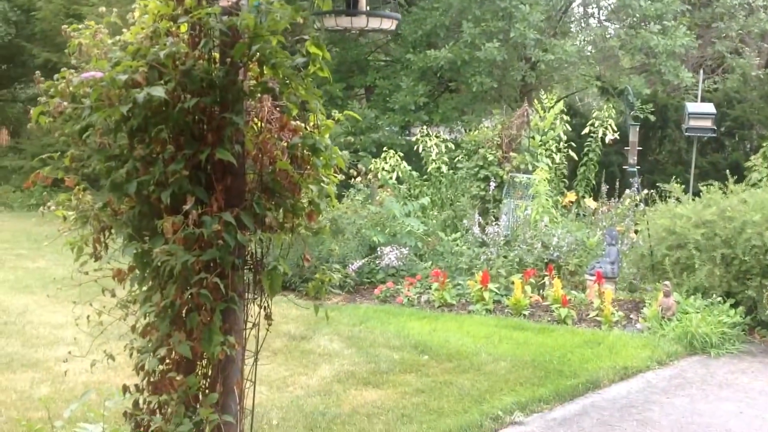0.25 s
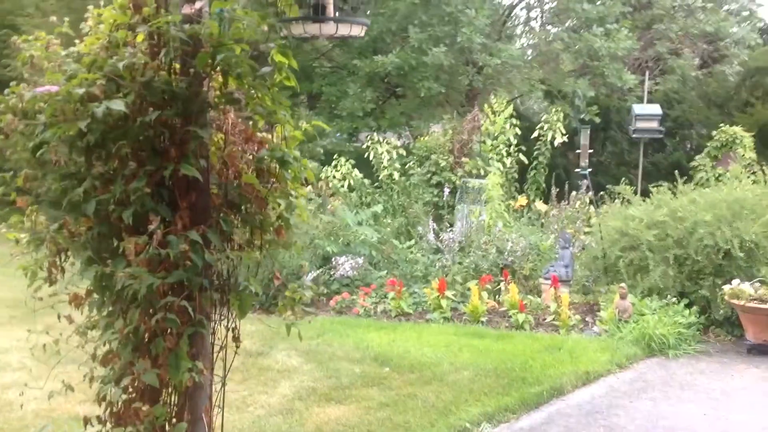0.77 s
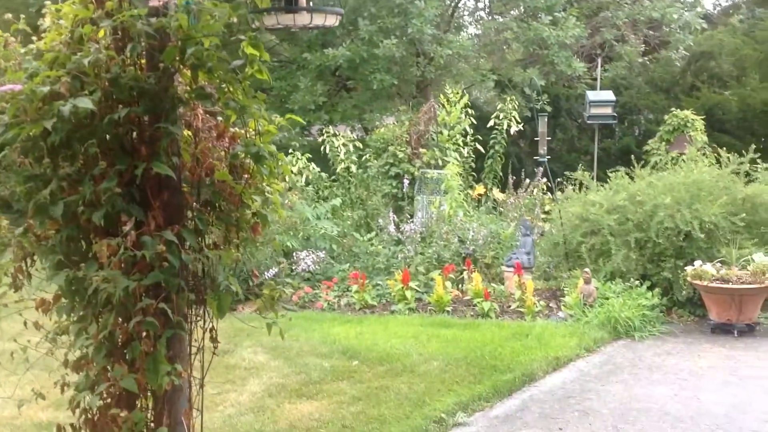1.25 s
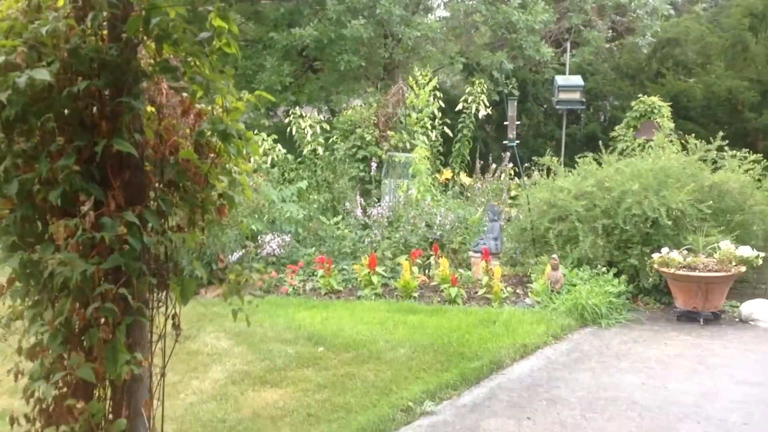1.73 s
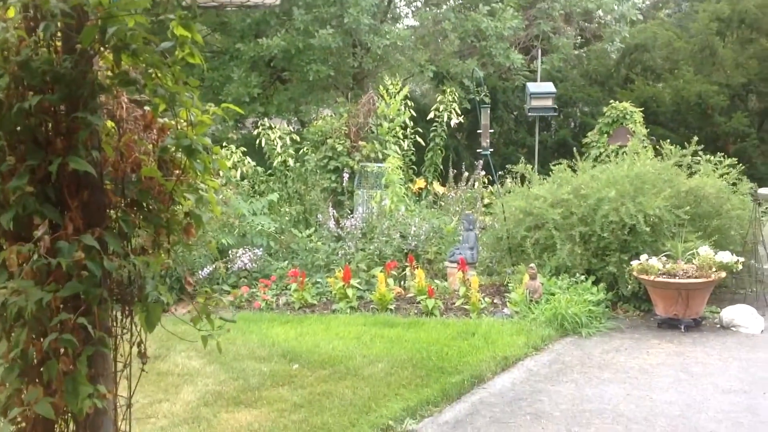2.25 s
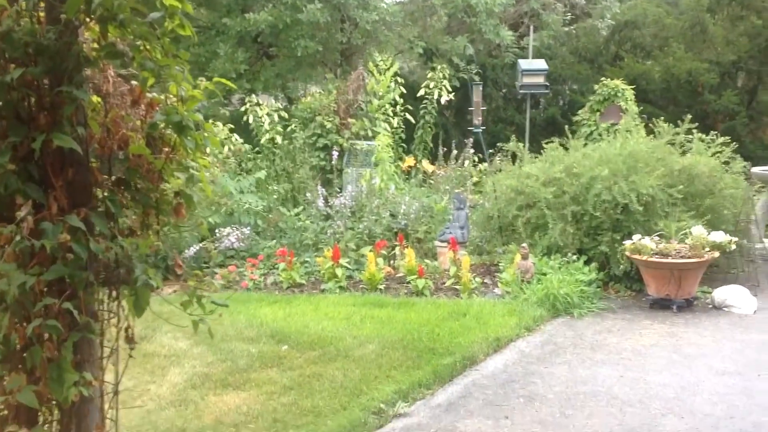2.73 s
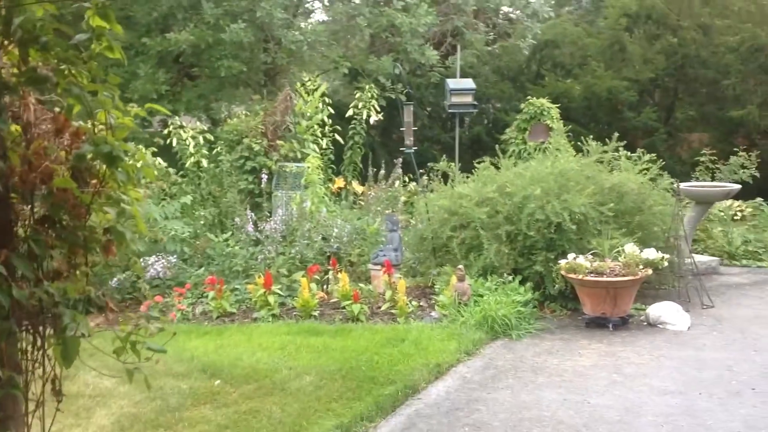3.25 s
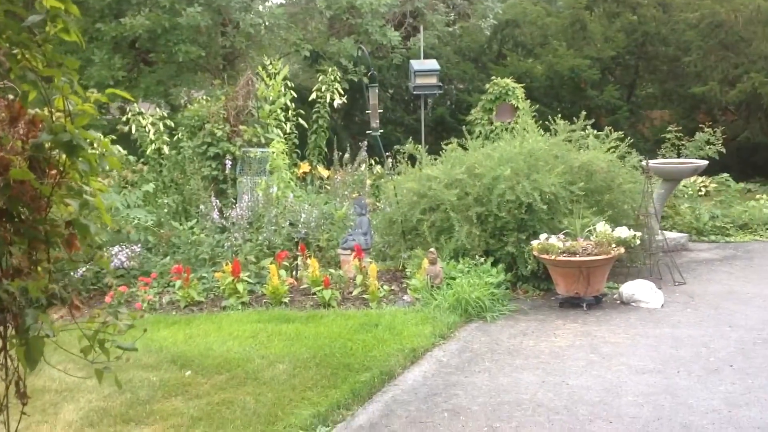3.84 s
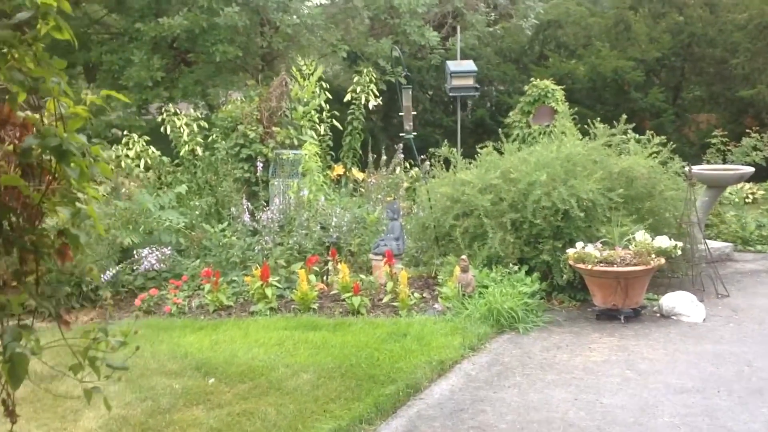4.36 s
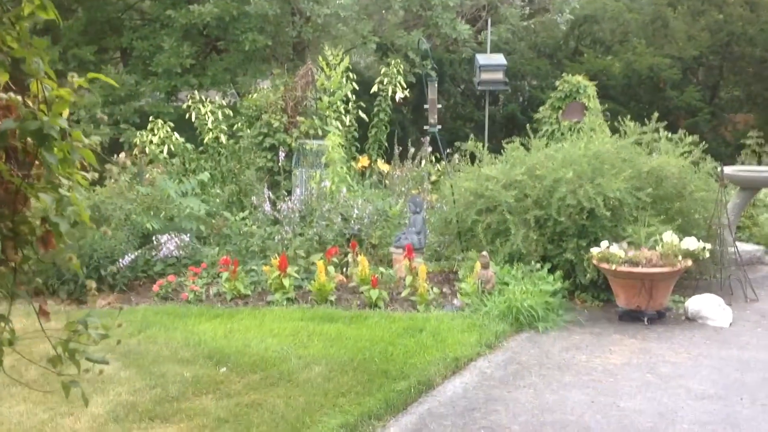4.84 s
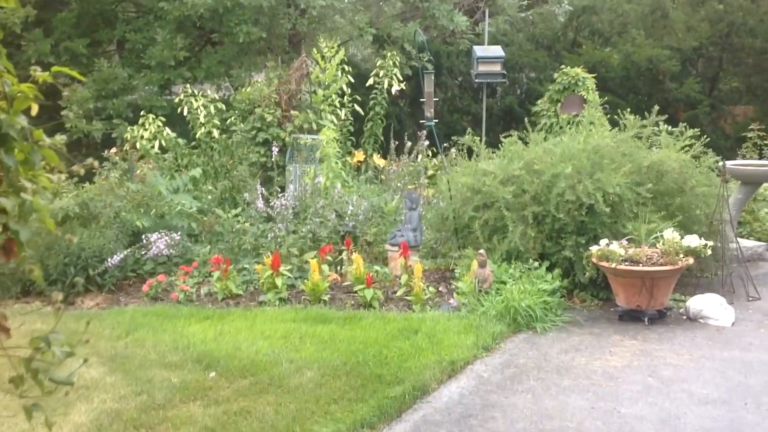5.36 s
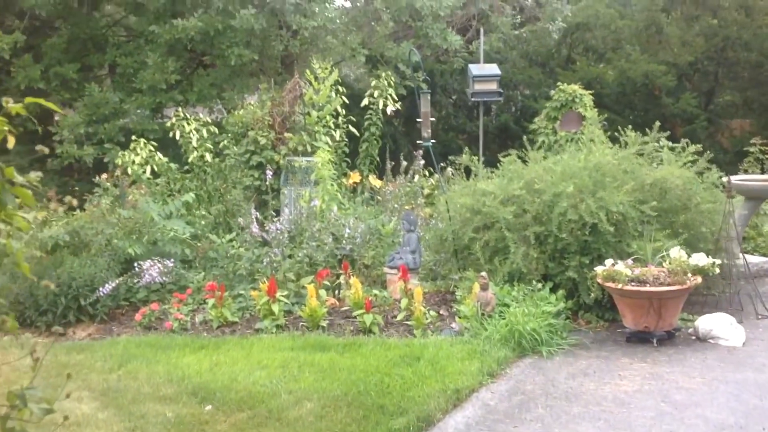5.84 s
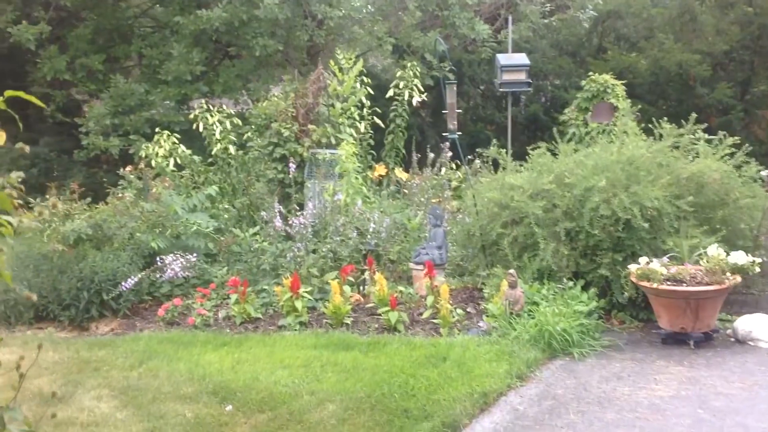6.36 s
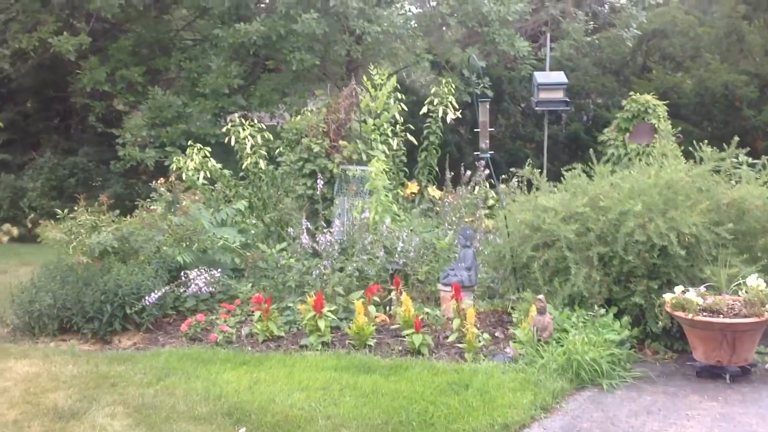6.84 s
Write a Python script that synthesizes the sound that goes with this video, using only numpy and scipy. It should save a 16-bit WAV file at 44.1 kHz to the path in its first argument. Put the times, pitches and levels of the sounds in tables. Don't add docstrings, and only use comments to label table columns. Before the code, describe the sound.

Five sharp firecracker bangs burst some way off in a garden neighbourhood, each slapping back off house walls and rolling away through trees.

```python
import sys
import numpy as np
from scipy import signal
from scipy.fft import rfft, irfft, next_fast_len
from scipy.io import wavfile
from scipy.ndimage import uniform_filter1d

SR = 44100
rng = np.random.default_rng(int(sys.argv[2]) if len(sys.argv) > 2 else 0)


def output_pcm(signal):
    pcm = np.clip(np.atleast_2d(signal).T, -1, 1) * 32767
    wavfile.write(sys.argv[1], SR, np.round(pcm).astype(np.int16))


def voltage_ratio(decibels):
    exponent = np.asarray(decibels, float) / 20
    return 10 ** exponent


N = 313110

# start in seconds, peak level in dB, blast length in ms, ground bounce in dB.
BURSTS = [
    (1.02466, 7.5, .32, -1),
    (2.33497, 7.5, .31, -2),
    (3.79624, 5.8, .39, 0),
    (5.9377, 7.5, .355, -.5),
    (6.79039, 8.7, .356, 2.3),
]
# sharp front in dB, roll in dB, roll brightness in dB per octave,
# near walls in dB, far walls in dB.
AFTER = [
    (-8, -19.5, 1.5, -7, 1),
    (-2, -19.5, 1.5, -4, 3),
    (-24, -20, 0.8, -1, -2),
    (-27, -19.5, 1, 3, -2),
    (-37, -20.5, 2, 5, 1.5),
]
# frequency in Hz, level in dB per Hz.
ROLL = [(24, -59), (40, -50), (97, -19.5), (149, -1), (264, 2), (327, 2), (566, -7), (735, -5), (1500, -14),
        (1740, -15.5), (2610, -19.5), (3820, -36), (7810, -50.5), (12000, -66), (15600, -88), (22000, -120)]


def unit(x):
    return x / np.sqrt(np.mean(x ** 2) + 1e-20)


def along(points, hz):
    f, v = np.transpose(points)
    return np.interp(np.log(hz + 1), np.log(f + 1), v)


def filtered(x, response):
    m = next_fast_len(len(x) + 8192)
    return irfft(rfft(x, m) * response(np.fft.rfftfreq(m, 1 / SR)), m)[:len(x)]


def band(centre_hz, q):
    return lambda f: 1j * f * centre_hz / q / (centre_hz ** 2 - f * f + 1j * f * centre_hz / q)


def add(track, s, sound):
    part = track[max(round(s * SR), 0):][:len(sound)]
    part += sound[:len(part)]


def patches(shape, patchy_db):
    field = rng.standard_normal(shape)
    field = uniform_filter1d(field, size=4, axis=0)
    field = uniform_filter1d(field, size=8, axis=1)
    return voltage_ratio(patchy_db * unit(field))


def rush(spectrum, patchy_db):
    z = signal.stft(rng.standard_normal(N + 512), nperseg=512)[2]
    patchy = signal.istft(z * patches(z.shape, patchy_db), nperseg=512)[1][:N]
    return unit(filtered(patchy, lambda hz: voltage_ratio(along(spectrum, hz))))


def traffic():
    # time in seconds, level in dB.
    swells = [(0, -42.5), (.5, -43.5), (0.949, -46), (2, -43.5), (3.5, -44), (4.7, -44), (5.2, -44.5),
              (5.898, -45.5), (7.1, -43.5)]
    # frequency in Hz, level in dB per Hz.
    hum = [(15, -72), (40, -44), (90, -16), (146, -5), (216, 0.5), (366, -1.5), (565, -5.5), (1000, -6.5),
           (1520, -6.5), (1750, -13), (2700, -17.5), (3700, -32), (6000, -83), (13200, -120)]
    s, db = np.transpose(swells)
    return voltage_ratio(np.interp(np.arange(N) / SR, s, db)) * rush(hum, patchy_db=.8)


def far_pops():
    # middle in seconds, level in dB, length in seconds.
    pops = [(0.228, -48, 0.038), (0.968, -42, 0.014), (4.457, -45, 0.069), (4.99, -41, 0.067),
            (5.34, -43, 0.02), (5.534, -44.5, 0.025), (5.626, -45, 0.035)]
    t = np.arange(N) / SR
    swell = sum(voltage_ratio(db) * np.exp(-.5 * ((t - s) / length) ** 2) for s, db, length in pops)
    return swell * unit(filtered(rng.standard_normal(N), lambda f: band(300, 1.2)(f) ** 2))


def bird():
    # seconds after the start, length in seconds, from Hz, to Hz, level in dB.
    long_call = [
        (0, .028, 5950, 6800, -17),
        (.034, .024, 4800, 4750, -6),
        (.058, .009, 4600, 3350, -5),
        (.067, .014, 3350, 3150, -9),
        (.084, .016, 3250, 4100, 0),
        (.1, .011, 4150, 3850, 0),
        (.111, .017, 3800, 3050, -1),
    ]
    short_call = [
        (.004, .034, 6280, 6230, -1),
        (.044, 0.029, 4350, 4850, 2.5),
        (.07, .02, 3950, 3800, 4),
    ]
    # start in seconds, rms level in dB, pitch factor, echo in dB.
    long_at = [
        (.172, -48, 1.005, 0),
        (2.515, -52, 1.01, 3),
        (4.051, -51, 1.01, 2),
        (5.734, -51, 1.005, -2),
    ]
    # start in seconds, rms level in dB, pitch factor, echo in dB.
    short_at = (6.674, -62, 1, 1)
    note_edge_s, glide_ease, husk_db = .003, 1.1, -24
    air = np.zeros(N)
    t, fade = np.arange(SR // 7) / SR, np.arange(SR // 2) / SR
    calls = [(long_call, c) for c in long_at] + [(short_call, short_at)]
    for notes, (start, level_db, factor, echo_db) in calls:
        s, length, from_hz, to_hz, db = np.transpose(notes)[..., None]
        gate = np.clip(np.minimum(t - s, s + length - t) / note_edge_s + .5, 0, 1)
        glide = to_hz + (from_hz - to_hz) * np.clip(1 - (t - s) / length, 0, 1) ** glide_ease
        flutter = unit(uniform_filter1d(rng.standard_normal((2, len(t))), size=90))
        pitch = factor * (gate * glide).sum(0) / (gate.sum(0) + 1e-9) * (1 + .012 * flutter[0])
        phase = 2 * np.pi * np.cumsum(pitch) / SR
        low_note = pitch < 5000
        edge = voltage_ratio(-14) * np.sin(2 * phase) + voltage_ratio(-21) * np.sin(2.5 * phase) * low_note
        shrill = np.clip((pitch - 3900) / 800, .15, 1)
        tone = np.sin(phase) + voltage_ratio(-26) * np.sin(3 * phase) * low_note + edge * shrill
        tone = tone + voltage_ratio(husk_db) * unit(np.diff(rng.standard_normal(len(t) + 2), 2))
        call = voltage_ratio(level_db + 3 + 4 * flutter[1]) * (gate * voltage_ratio(db)).sum(0) * tone
        leaves = rng.standard_normal(len(fade)) * voltage_ratio(-60 * fade / .55)
        leaves = leaves / np.linalg.norm(leaves)
        blur = filtered(leaves, lambda f: .25 + .75 / (1 + (f / 5200) ** 6))
        add(air, start, call)
        add(air, start + 0.033, voltage_ratio(-15) * call)
        add(air, start, voltage_ratio(echo_db) * signal.fftconvolve(call, blur))
    return air


def twigs():
    # start in seconds, level in dB, length in ms, centre in Hz.
    snaps = [(1.868, -39, 5, 2000), (1.9645, -31, 2.5, 2600), (1.9695, -37, 5, 2300), (1.974, -36, 3, 2500),
             (1.986, -46, 14, 2500), (2.3235, -27, 12, 2300), (2.343, -39, 20, 3000),
             (3.215, -50, 10, 2800), (4.386, -47, 5, 2800), (5.639, -37, 6, 800), (5.752, -49, 8, 2200)]
    air, t = np.zeros(N), np.arange(SR // 10) / SR

    def wood(f):
        ring = band(hz, 1.3)(f) ** 2 / (1 + 1j * f / 4000)
        skirt = .13 * (hz / 2500) ** 2 / (1 + 1j * f / 7000) ** 2 * (f > 500)
        return ring + skirt

    for s, db, length_ms, hz in snaps:
        spiky = rng.standard_normal(len(t)) * voltage_ratio(4 * rng.standard_normal(len(t)))
        add(air, s, voltage_ratio(db) * unit(filtered(spiky, wood)) * np.exp(-1000 * t / length_ms))
    return air


def puff(centre_hz, t60):
    t = np.arange(SR // 6) / SR

    def dull(f):
        lean = .25 + abs(band(centre_hz, .9)(f))
        return voltage_ratio(along(ROLL, f)) * lean * (1 + f / 900) / (1 + (f / 4500) ** 4)

    noise = unit(filtered(rng.standard_normal(len(t)), dull))
    return noise * (1 - np.exp(-t / .0012)) ** 2 * voltage_ratio(-60 * t / t60)


def walls():
    # middle in seconds, peak level in dB, pitch in Hz.
    slaps = [
        (1.1336, -10, 1200),
        (2.4428, -10, 1300),
        (3.9029, -8, 1050),
        (6.0410, -5, 1250),
        (6.8921, -3, 1250),
    ]
    # delay in seconds, peak level in dB, centre in Hz,
    # time to fade 60 dB in seconds.
    answers = [
        (.054, -28, 800, .05),
        (.079, -11, 320, 0.046),
        (.175, -15, 395, 0.072),
        (.201, -15.5, 480, 0.11),
        (.231, -18.5, 500, 0.1),
        (.286, -23, 250, .07),
        (.344, -28, 500, 0.086),
        (.394, -21, 800, 0.037),
    ]
    # start in seconds, peak level in dB, centre in Hz,
    # time to fade 60 dB in seconds.
    stray = [
        (2.39, -16, 2200, .05),
        (2.508, -25, 4500, .12),
        (1.2, -27, 4500, .15),
        (4.249, -22, 400, .037),
    ]
    far_wall_s = .12
    slap_s, shift = .1089, .8
    air, t = np.zeros(N), np.arange(-88, 88) / SR
    for (burst_s, *_), (s, db, hz), (*_, near_db, far_db) in zip(BURSTS, slaps, AFTER):
        pulse = np.cos(2 * np.pi * hz * t) * np.exp(-(t * hz / .57) ** 2)
        add(air, s + t[0], -voltage_ratio(db) * pulse)
        add(air, s, voltage_ratio(db - 13) * puff(hz, t60=.04))
        late = shift * (s - burst_s - slap_s)
        for delay, wall_db, wall_hz, t60 in answers:
            level_db = wall_db + (far_db if delay > far_wall_s else near_db) + rng.normal(0, 1.5)
            echo = puff(wall_hz, np.clip(t60, .02, .3))
            add(air, burst_s + delay + late, voltage_ratio(level_db - 7.5) * echo)
    for s, db, hz, t60 in stray:
        add(air, s, voltage_ratio(db - 6) * puff(hz, np.clip(t60, .02, .3)))
    return air


def blast(length_ms, ground_db, front_db):
    # delay in ms, level in dB.
    near = [
        (2.12, -4),
        (7, -7),
        (9.4, -7),
        (11.8, -8),
        (14.6, -11),
        (21.4, -9),
        (24.5, -12),
    ]
    t = np.arange(SR // 10) / SR
    u = 1000 * t / length_ms
    shock = (1 - u) * np.exp(-.765 * u)
    spike = filtered(shock, lambda hz: 1 / (1 + 1j * hz / 700) ** 2)
    front = filtered(shock * np.exp(-u), lambda hz: 1 / (1 + 1j * hz / 2500) ** 3)
    copies = np.zeros(len(t))
    for k, (delay_ms, db) in enumerate(near):
        change_db = ground_db if k == 0 else rng.normal(0, 1.5)
        add(copies, delay_ms / 1000, voltage_ratio(db + change_db) * spike)
    copies = filtered(copies, lambda hz: 1 / (1 + 1j * hz / 1040) ** 2)
    heard = spike + voltage_ratio(front_db) * front + copies
    return filtered(heard, lambda hz: -hz * hz / (220 ** 2 + 1j * hz * 220 / 3.5 - hz * hz))


def roll(tilt_db):
    # frequency in Hz, time to fade 60 dB in seconds.
    street_fade = [(100, 0.69), (300, 0.69), (1000, 0.71), (3000, 0.46), (8000, 0.074)]
    trees_fade = [(100, 3.16), (300, 3.35), (1000, 3.6), (3000, 2.44), (8000, 0.97)]
    # delay in seconds, width in seconds, depth in dB.
    lulls = [
        (0.058, 0.026, 10),
        (.152, .02, 19),
    ]
    clumps = uniform_filter1d(rng.standard_normal(3 * SR), size=40) * np.sqrt(40)
    grains = voltage_ratio(2.4 * clumps)
    hz, t, z = signal.stft(unit(grains * rng.standard_normal(3 * SR)), SR, nperseg=256)
    close = np.where(hz[:, None] < 500, voltage_ratio(-2 - 60 * t / .11), voltage_ratio(-7 - 60 * t / .025))
    lull_db = sum(depth_db * np.exp(-((t - s) / width) ** 2) for s, width, depth_db in lulls)
    street = voltage_ratio(-4 - 16 * t - lull_db - 60 * t / along(street_fade, hz)[:, None])
    trees = voltage_ratio(-9 - 60 * t / along(trees_fade, hz)[:, None])
    echoes = z * (close + street + trees) * patches(z.shape, 2.14)
    tail = signal.istft(echoes, SR, nperseg=256)[1]

    def colour(f):
        return voltage_ratio(along(ROLL, f) + tilt_db * np.log2((f + 50) / 700))

    level = np.sqrt(np.mean(colour(np.arange(20, SR // 2, 20.)) ** 2))
    rise = np.clip(np.arange(len(tail)) / SR / .002, 0, 1)
    return rise * filtered(tail, colour) / level


def firecrackers():
    air = np.zeros(N)
    for (s, db, length_ms, ground_db), (front_db, roll_db, tilt_db, *_) in zip(BURSTS, AFTER):
        add(air, s, voltage_ratio(db) * blast(length_ms, ground_db, front_db))
        add(air, s, voltage_ratio(roll_db) * roll(tilt_db))
    return air


def scene():
    background = traffic() + far_pops()
    garden = bird() + twigs()
    return (background + garden + walls() + firecrackers())[None]


def top_cut(x):
    return signal.sosfilt(signal.butter(12, 15310, fs=SR, output="sos"), x)


def record(dry):
    # frequency in Hz, level in dB per Hz.
    hiss_colour = [(1500, -6), (4000, 0), (6300, -1), (8000, -2), (12500, -3.5), (15000, -5)]
    heard = filtered(dry[0], lambda hz: (1j * hz / (70 + 1j * hz)) ** 2)
    hiss = voltage_ratio(-64) * rush(hiss_colour, patchy_db=1.0)
    mix = filtered(heard + hiss, lambda hz: hz < 15310)[None]
    return top_cut(mix)


dry = scene()
out = record(dry)
output_pcm(out)
```